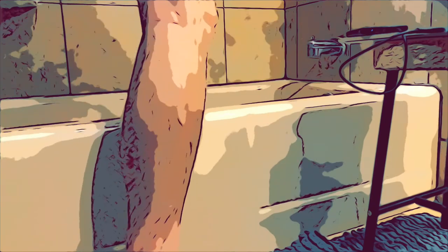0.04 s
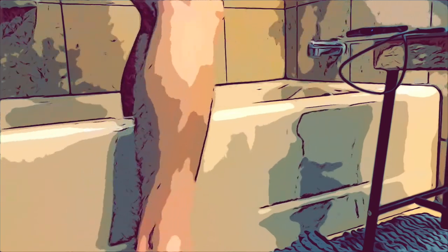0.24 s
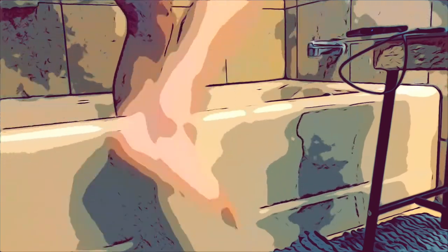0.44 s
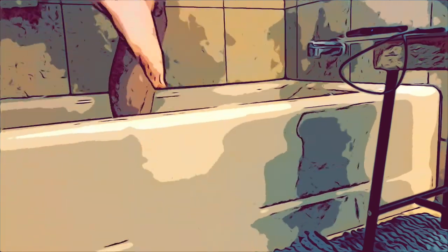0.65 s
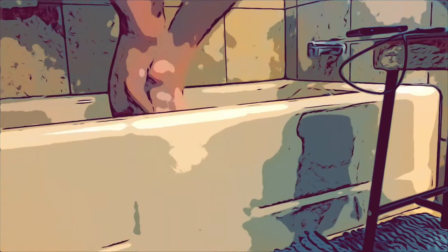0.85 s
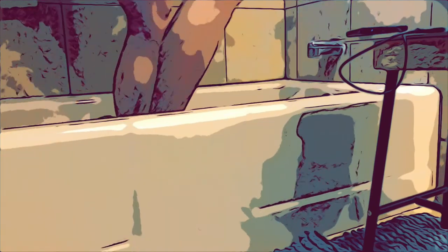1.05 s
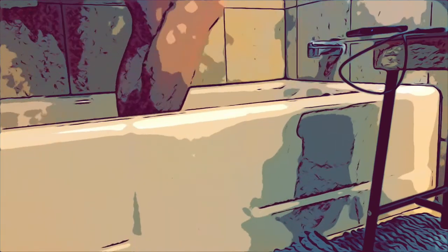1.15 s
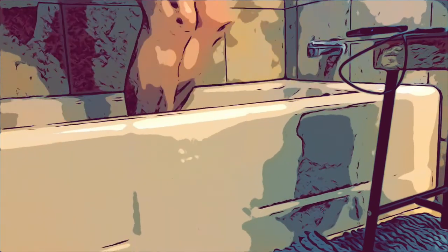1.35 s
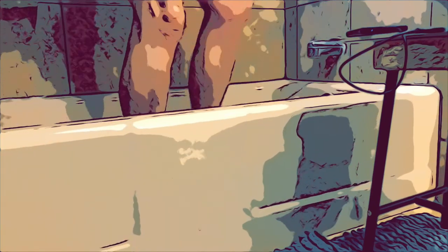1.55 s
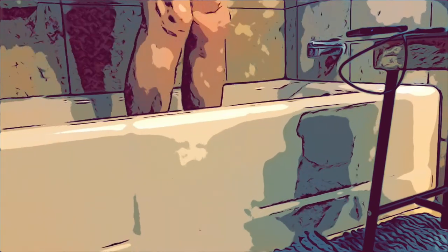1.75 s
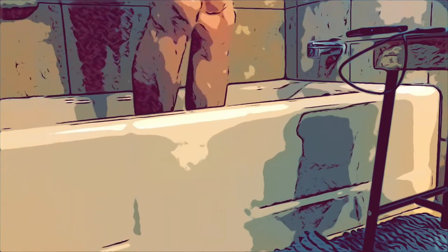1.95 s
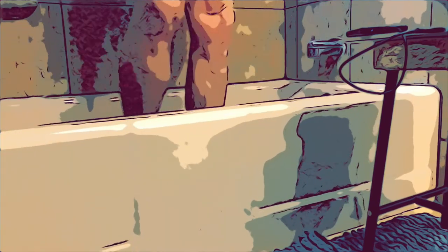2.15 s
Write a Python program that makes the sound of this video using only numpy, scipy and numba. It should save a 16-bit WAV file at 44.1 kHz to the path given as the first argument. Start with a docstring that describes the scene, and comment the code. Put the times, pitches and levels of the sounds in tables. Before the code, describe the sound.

Water splashes and plinks close by as someone climbs into a bathtub in a small tiled room. Faint drips lead to two bubbly bursts, the second louder, while the tub booms softly under shifting weight over a low hum.

```python
"""A foot is lifted over the rim and set down in a filled bathtub, in a small tiled bathroom.
From the start, over a low hum and faint hiss, the bath heaves, the tub booms under shifting weight
and light drips plink. At 0.8 s splashes fizz as swarms of tiny bubbles. After a lull, the loudest
splashes and plinks come at 1.5-1.8 s, a last small one near 2.2 s. The tiles echo plinks and fizz."""
import sys
import numpy as np
from scipy import signal
from scipy.fft import rfft, irfft
from scipy.io import wavfile
from scipy.ndimage import uniform_filter1d
from numba import njit

SR = 44100
rng = np.random.default_rng(int(sys.argv[2]) if len(sys.argv) > 2 else 0)


def pcm_store(signal):
    """Save signal as 16-bit PCM."""
    levels = np.round(np.clip(np.atleast_2d(signal), -1, 1) * 32767)
    wavfile.write(sys.argv[1], SR, levels.astype(np.int16).T)


N = 96534
TIME_S = np.arange(N) / SR

# room air spectrum: freq_hz, density_db
HISS_SPECTRUM = [(60, 0), (125, -2), (250, -9), (400, -7), (700, -16), (1500, -24), (4000, -29.5),
                 (6000, -29), (9000, -32), (15000, -35)]
# bath water swell: time_s, level_db
SLOSH_ENVELOPE = [(0.0, -41), (0.05, -51), (0.14, -30), (0.39, -51), (0.44, -43), (0.6, -54), (0.66, -46),
                  (0.76, -59), (0.83, -45), (0.88, -64), (1.02, -49), (1.11, -62), (1.14, -44), (1.27, -35),
                  (1.58, -53), (1.6, -38), (1.63, -35), (1.68, -47), (1.72, -33), (1.85, -45), (1.91, -32),
                  (2.0, -49), (2.11, -44), (2.19, -53)]
# low tub resonances: pitch_hz, gain_db, t60_s
TUB_MODES = [(45, -4, .25), (67, 3.5, .45), (85, 3, .5), (112, -5, .25), (142, -3, .3), (201, -2.5, .35),
             (289, -11, .35), (390, -12, .3)]
# weight shifting on the tub: start_s, level_db, length_s, centre_hz
WEIGHT_PUSHES = [(0, -48, .04, 75), (.08, -48, .1, 190), (.09, -49, .1, 85), (.2, -49, .08, 67),
                 (.4, -52, .08, 85), (.53, -44, .1, 85), (.79, -47, .04, 200), (.83, -41, .08, 230),
                 (.82, -49, .1, 85), (.97, -49, .06, 150), (1.15, -40, .07, 65), (1.28, -43, .1, 170),
                 (1.36, -43, .08, 67), (1.53, -49, .08, 200), (1.5, -49, .1, 70), (1.6, -47, .08, 105),
                 (1.73, -44, .08, 160), (2.04, -47, .08, 85)]
# early reflections: delay_s, gain_db
WALL_ECHOES = [(.0075, -10), (.019, -7), (.027, -8)]
# lone bubbles and drips: start_s, pitch_hz, level_db, ring_cycles
PLINKS = [(.002, 458, -47, 13), (.003, 1690, -54, 30), (.032, 4100, -61, 12), (.082, 3000, -50, 14),
          (.108, 1800, -58, 8), (.116, 1990, -49, 12), (.138, 1950, -52, 22), (.123, 840, -52, 8),
          (.234, 975, -59, 10), (.246, 2330, -63, 10), (.305, 1750, -60, 10), (.313, 1880, -58, 20),
          (.409, 1470, -64, 10), (.475, 2000, -59, 5), (.826, 450, -52, 6), (.840, 880, -46, 7),
          (.848, 1550, -52, 8), (.875, 650, -50, 10), (.922, 1300, -54, 8), (.936, 1600, -53, 8),
          (.945, 2200, -50, 14), (.990, 4550, -41, 20), (.992, 2860, -46, 8), (1.003, 1000, -56, 8),
          (1.079, 1470, -49, 14), (1.085, 2450, -52, 8), (1.165, 850, -64, 14), (1.401, 5300, -62, 12),
          (1.402, 1020, -54, 6), (1.420, 2450, -55, 10), (1.434, 2100, -52, 8), (1.436, 3500, -54, 8),
          (1.496, 3150, -44, 10), (1.496, 2300, -53, 6), (1.508, 1390, -38, 12), (1.556, 640, -48, 14),
          (1.575, 1500, -47, 8), (1.616, 1020, -45, 6), (1.668, 465, -48, 8), (1.683, 930, -31, 8),
          (1.702, 1480, -37, 6), (1.732, 750, -42, 8), (1.751, 1090, -36, 16), (1.777, 1120, -38, 10),
          (1.751, 3300, -48, 8), (1.762, 615, -45, 14), (1.769, 3050, -47, 10), (1.813, 8200, -58, 14),
          (1.838, 2000, -50, 8), (1.914, 1800, -53, 14), (1.962, 3750, -52, 10), (2.010, 2380, -55, 14),
          (2.163, 2750, -66, 8), (2.165, 1200, -62, 10), (2.176, 615, -51, 10)]
# bubble swarms: start_s, level_db, rise_s, fall_s (to -20 dB), centre_hz, spread_oct
SPLASH_SWARMS = [(0, -61, .002, .1, 3500, 1.1), (.083, -61, .01, .06, 6000, .5),
                 (.06, -61, .04, .08, 600, .25), (.1, -66, .03, .1, 1400, .4),
                 (.232, -67, .01, .15, 1800, 1.1), (.3, -69, .01, .1, 3000, 1.2),
                 (.474, -55, .001, .01, 4200, .8), (.792, -59, .002, .05, 7500, .35),
                 (.803, -56, .008, .13, 3700, .5), (.81, -58, .03, .15, 1400, .5),
                 (.82, -51, .04, .12, 520, .6), (.84, -61, .004, .04, 9500, .3),
                 (.9, -61, .02, .08, 5500, .3), (.93, -56, .04, .06, 2300, .45),
                 (.96, -58, .04, .1, 1100, .3), (.989, -51, .004, .1, 3800, .9),
                 (1.07, -58, .02, .08, 4000, .7), (1.2, -72, .02, .15, 3500, .9),
                 (1.38, -68, .003, .05, 6000, .9), (1.4, -62, .005, .08, 1200, .7),
                 (1.42, -60, .02, .1, 4000, .9), (1.52, -64, .003, .03, 8000, .7),
                 (1.531, -53, .001, .04, 11500, .25), (1.528, -50, .006, .13, 2500, .9),
                 (1.545, -52, .03, .12, 750, .5), (1.6, -54, .02, .1, 3000, .9),
                 (1.69, -51, .02, .1, 1300, .8), (1.74, -50, .03, .08, 1300, .7),
                 (1.69, -59, .02, .1, 5000, .7), (1.75, -58, .03, .1, 5000, .7),
                 (1.84, -59, .01, .12, 2100, .5), (2.16, -66, .01, .1, 2000, 1.1)]


def undb(db):
    """dB to gain."""
    return 10 ** (np.asarray(db) / 20)


def shaped_noise(gain_at_hz):
    """Unit-rms noise with a gain per frequency."""
    freq_hz = np.fft.rfftfreq(N, 1 / SR) + 1
    noise = irfft(rfft(rng.standard_normal(N)) * gain_at_hz(freq_hz), N)
    return noise / np.sqrt(np.mean(noise ** 2))


def room_hiss(level_db=-62.5, low_cut_hz=40):
    """Steady air noise of the room."""
    freq_hz, density_db = np.array(HISS_SPECTRUM).T
    air = shaped_noise(lambda f: undb(np.interp(np.log(f), np.log(freq_hz), density_db)) * (f > low_cut_hz))
    return undb(level_db) * air


def slosh(centre_hz=20.5, waver_hz=4):
    """The whole bath heaves: a wavering swell near the bottom of hearing."""
    time_s, level_db = np.array(SLOSH_ENVELOPE).T
    pitch_hz = centre_hz + waver_hz * shaped_noise(lambda f: np.exp(-f / 3))
    swell = uniform_filter1d(undb(np.interp(TIME_S, time_s, level_db)), size=600)
    phase_cycles = np.cumsum(pitch_hz) / SR + rng.random()
    return swell * np.sqrt(2) * np.sin(2 * np.pi * phase_cycles)


def tub(hum_db=-59, hum_ref_hz=85, tilt_db_per_oct=-6, octave_off_loss_db=22):
    """The tub's modes hum under steady noise and boom under soft pushes of weight."""
    out = np.zeros(N)
    for pitch_hz, gain_db, t60_s in TUB_MODES:
        radius = np.exp(-np.log(1000) / (t60_s * SR))
        loss = 1 - radius ** 2
        hum_gain = undb(hum_db + tilt_db_per_oct * np.log2(pitch_hz / hum_ref_hz))
        drive = hum_gain * np.sqrt(2 * loss) * rng.standard_normal(N)
        drive[0] /= np.sqrt(loss)  # already ringing at the start
        for start_s, level_db, length_s, centre_hz in WEIGHT_PUSHES:
            window = np.hanning(int(length_s * SR))
            carrier = np.cos(2 * np.pi * (pitch_hz * TIME_S[:len(window)] + rng.random()))
            push_db = level_db - octave_off_loss_db * np.log2(pitch_hz / centre_hz) ** 2
            i = int(start_s * SR)
            drive[i:i + len(window)] += undb(push_db) * 2 * window / window.sum() * carrier
        step_rad = 2 * np.pi * pitch_hz / SR
        feedback = [1, -2 * radius * np.cos(step_rad), radius ** 2]
        out += undb(gain_db) * signal.lfilter([np.sin(step_rad)], feedback, drive)
    return out


def tiled_room(sound, tail_db=.5, low_t60_s=.36, high_t60_s=.24, split_hz=4000, build_s=.008):
    """Direct sound, a few wall echoes, then a dense tail that loses its treble first."""
    time_s = TIME_S[:SR]
    noise = rng.standard_normal(SR)
    low = signal.sosfilt(signal.butter(1, split_hz, fs=SR, output="sos"), noise)
    tail = low * undb(-60 * time_s / low_t60_s) + (noise - low) * undb(-60 * time_s / high_t60_s)
    tail *= 1 - np.exp(-(time_s / build_s) ** 2)
    response = undb(tail_db) * tail / np.sqrt(.03 * SR)
    response[0] = 1
    for delay_s, gain_db in WALL_ECHOES:
        response[int(delay_s * SR)] += undb(gain_db)
    return signal.fftconvolve(sound, response)[:N]


@njit
def ring_bubbles(start_s, pitch_hz, gain, ring_cycles, glide=.05, attack_cycles=1.3):
    """Each bubble is a sine that swells in, glides up and decays 20 dB per ring_cycles."""
    out = np.zeros(N)
    for k in range(len(start_s)):
        cycle, i = 0., int(start_s[k] * SR)
        while cycle < 2.5 * ring_cycles[k] and i < N:
            attack = 1 - np.exp(-cycle / attack_cycles)
            decay = np.exp(-2.3 * cycle / ring_cycles[k])
            out[i] += gain[k] * attack * decay * np.sin(2 * np.pi * cycle)
            cycle += pitch_hz[k] * (1 + glide * cycle / ring_cycles[k]) / SR
            i += 1
    return out


def plinks():
    """Lone bubbles and drips, each ringing once."""
    start_s, pitch_hz, level_db, ring_cycles = np.array(PLINKS, float).T
    return ring_bubbles(start_s, pitch_hz, undb(level_db), ring_cycles)


def splashes(bubbles_each=600, ring_cycles=6., scatter_db=2.4):
    """Each splash frees a swarm of tiny bubbles that swells quickly and fades."""
    start_s, level_db, rise_s, fall_s, centre_hz, spread_oct = np.array(SPLASH_SWARMS, float).T[:, :, None]
    shape = (len(start_s), bubbles_each)
    delay_s = rng.random(shape) * (rise_s + 1.5 * fall_s)
    offset_oct = 2 * spread_oct * (rng.random(shape) + rng.random(shape) - 1)
    pitch_hz = np.clip(centre_hz * 2 ** offset_oct, 100, 17000)
    envelope = np.minimum(delay_s / rise_s, 1) * undb(-20 * np.maximum(delay_s - rise_s, 0) / fall_s)
    bubble_db = level_db + scatter_db * (rng.exponential(1, shape) - 1)
    overlap = bubbles_each * ring_cycles / (centre_hz * (rise_s + fall_s))
    gain = undb(bubble_db) * envelope / np.sqrt(overlap)
    onset_s = start_s + delay_s
    return ring_bubbles(onset_s.ravel(), pitch_hz.ravel(), gain.ravel(), np.full(gain.size, ring_cycles))


def scene(water_gain_db=9, splash_gain_db=7):
    """Close, echoing water over tub, slosh and hiss; mono."""
    water = plinks() + undb(splash_gain_db) * splashes()
    return np.array([undb(water_gain_db) * tiled_room(water) + tub() + slosh() + room_hiss()])


def record(dry):
    """Steep low-pass on the top treble."""
    cutoff_hz = 15650
    return signal.sosfilt(signal.ellip(10, .2, 70, cutoff_hz, fs=SR, output="sos"), dry)


dry = scene()
out = record(dry)
pcm_store(out)
```